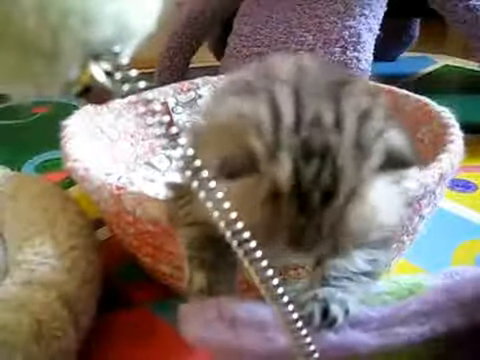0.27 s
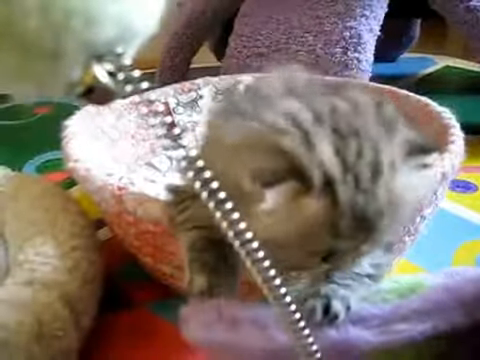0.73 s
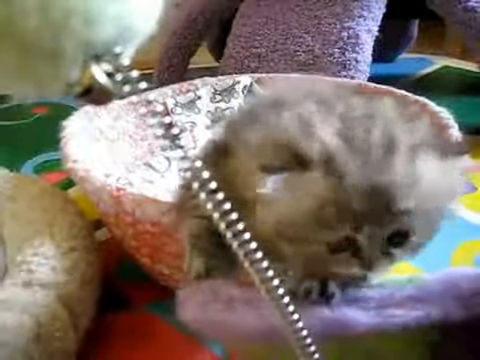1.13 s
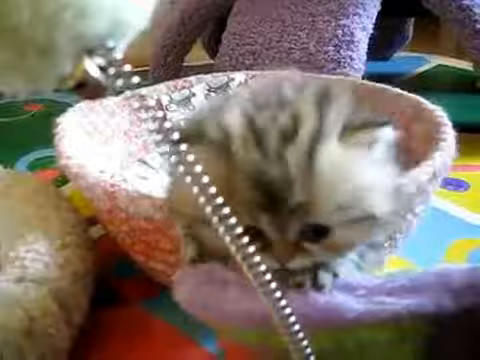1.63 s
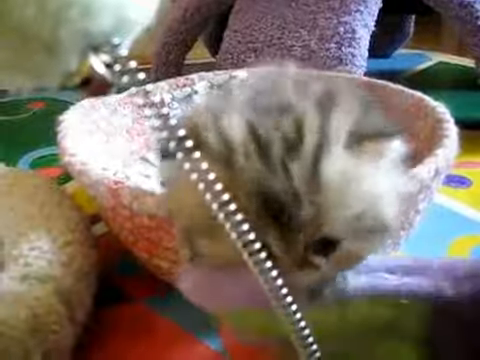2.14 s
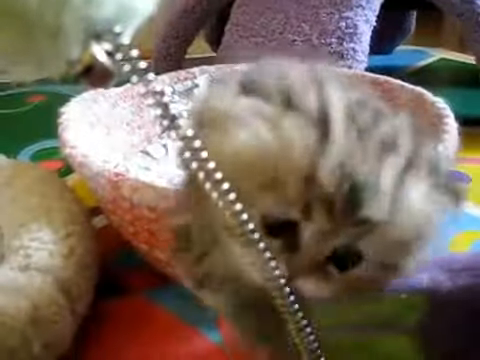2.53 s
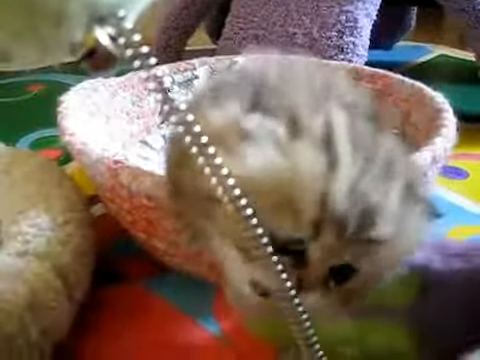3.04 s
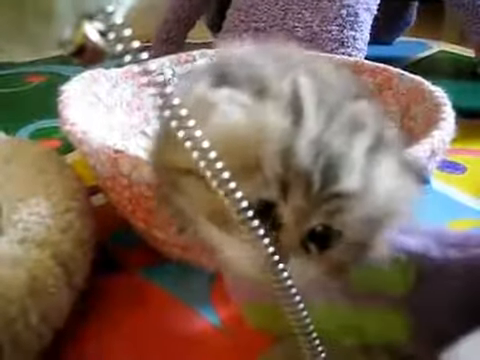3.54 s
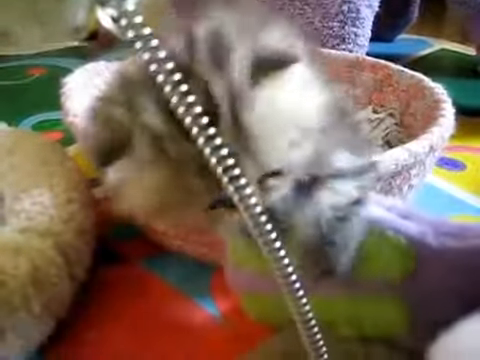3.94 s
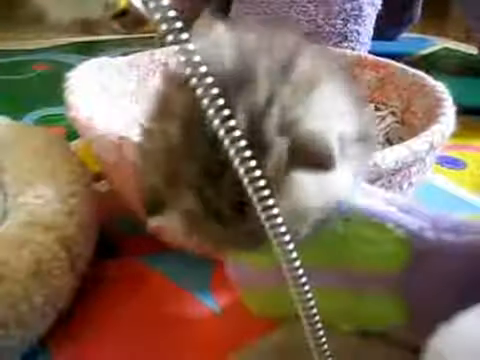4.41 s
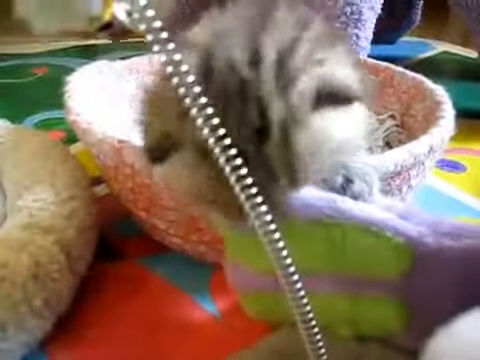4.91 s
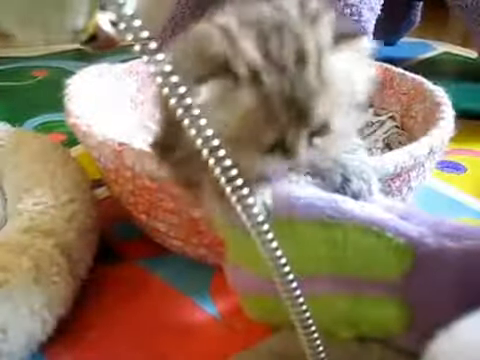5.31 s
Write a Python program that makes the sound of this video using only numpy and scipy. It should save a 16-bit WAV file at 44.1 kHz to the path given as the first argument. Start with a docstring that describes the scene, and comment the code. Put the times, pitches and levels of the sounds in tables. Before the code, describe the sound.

A small metal bead chain clicks faintly and irregularly as a kitten bites and noses it, with soft rustling over room hiss.

```python
"""A taut metal bead chain clicks as a kitten in a basket noses and bites it, close by in a quiet room.
Each impact of teeth or beads excites resonances that fur and tension damp within milliseconds.
The kitten's moves bump the basket and rub cloth and beads; basket, floor and walls return short echoes.
Behind lie an even hiss, a thin appliance whine and a faint low drone. The sound is mono, dull on top."""
import sys
import numpy as np
from scipy import signal
from scipy.fft import rfft, irfft
from scipy.io import wavfile
from scipy.ndimage import uniform_filter1d

SR = 44100
rng = np.random.default_rng(int(sys.argv[2]) if len(sys.argv) > 2 else 0)


def dump(signal):
    """Clip the signal to [-1, 1] and save it as 16-bit WAV at the path in sys.argv[1]."""
    limited = np.clip(np.atleast_2d(signal).T, -1, 1)
    pcm = np.round(limited * 32767).astype(np.int16)
    wavfile.write(sys.argv[1], SR, pcm)


N = 245195

# Modes of a contact, from dull knock to bead tick: (frequency [Hz], ring length [ratio])
MODES = [(850, 1.8), (1500, 1.58), (2300, 1.21), (3750, 1.07), (5750, 0.73)]
# Teeth and claws on the chain: (time [s], tuning [ratio], base rise time [s], knock centre [Hz],
# knock half-width [octaves], relative knock level [dB], relative tick level [dB])
BITE_IMPACTS = [(0.658, 1.03, 0.00042, 2400, 0.51, -32, -30.5), (1.019, 0.85, 0.0005, 1600, 0.41, -39, -55),
                (2.0722, 1.02, 0.0004, 1000, 2.6, -35, -25.5),
                (2.7355, 0.94, 0.00054, 1450, 0.94, -33.5, -42),
                (2.9382, 0.96, 0.0007, 2160, .7, -26.5, -42), (2.942, 0.99, 0.00059, 3100, 0.8, -27, -29),
                (2.9494, 1.2, 0.00087, 1550, 0.63, -37, -47), (2.98, 1.3, 0.00038, 1760, 1.6, -38, -42),
                (3.001, 1.02, 0.00046, 1650, 0.81, -25, -34.5),
                (3.0538, 1.11, 0.00039, 1910, .7, -30.5, -26.5),
                (3.0718, 1.05, 0.00038, 2640, 1.1, -29.5, -28),
                (3.2266, 0.98, 0.00031, 900, 3.1, -33.5, -37), (3.434, 1.006, 0.0005, 5000, 1.7, -24, -36),
                (3.658, 1.3, 0.00031, 1900, 1.25, -26, -23.5), (3.903, 1.05, 0.00039, 3300, 2.6, -24, -36),
                (3.9283, 1.09, 0.00022, 4100, .65, -20, -34), (3.931, 0.92, 0.00055, 2400, 1.4, -29.5, -33),
                (4.7746, 0.96, 0.00044, 3600, 2, -40, -41),
                (4.9448, 1.024, 0.00054, 2000, 0.85, -29.5, -24),
                (5.101, 0.98, 0.00062, 2420, 0.75, -45.5, -49)]


def bites(gain_db):
    """Modal superposition: a knock excites the modes near its centre, the beads' tick the highest."""
    out = np.zeros(N)
    t = np.arange(SR // 100) / SR
    modes_hz, length = np.transpose(MODES)
    for s, tuning, rise_s, centre_hz, octaves, knock_db, tick_db in BITE_IMPACTS:
        hz = modes_hz * tuning  # the grip shifts the tuning
        excitation = 1 / (1 + (np.log2(hz[:-1] / centre_hz) / octaves) ** 2)
        gains = np.append(undb(knock_db) * excitation / excitation.max(), undb(tick_db))
        add(out, s, gains @ burst(t, hz[:, None], length[:, None] * rise_s))
    return out * undb(gain_db)


# Bead on bead: (time [s], tuning [ratio], relative level [dB], fall toward the bass [dB/octave])
BEAD_IMPACTS = [(0.082, 1.1, -31.5, 26), (0.7339, 1.16, -27, 23), (0.738, 1.2, -31, 20),
                (0.7803, 0.88, -28, 13), (0.7838, 0.83, -36, 10), (2.0631, 0.91, -28.5, 14),
                (2.3667, 0.85, -35, 18), (4.082, 0.92, -35, 7), (4.1437, 1.36, -20, 12),
                (4.3492, 0.97, -34.5, 1.5), (4.4096, 0.98, -38, 8)]


def bead_ticks(gain_db, rise_s=0.00029):
    """Hard impact: brief metal contacts excite the highest mode most, the lower ones ever less."""
    out = np.zeros(N)
    t = np.arange(SR // 100) / SR
    hz, length = np.transpose(MODES)
    for s, tuning, db, fall_db in BEAD_IMPACTS:
        gains = undb(db - fall_db * np.log2(hz[-1] / hz))
        add(out, s, gains @ burst(t, tuning * hz[:, None], length[:, None] * rise_s))
    return out * undb(gain_db)


def stray_ticks(count=8, db=-45, spread_db=2, rise_s=0.00025, low_hz=2500, high_hz=5800):
    """Damped oscillation: beads of the swaying chain touch at random, each ringing one faint mode."""
    out = np.zeros(N)
    t = np.arange(SR // 100) / SR
    for when, pitch, size in rng.random((count, 3)):
        hz = low_hz + pitch * (high_hz - low_hz)
        gain = undb(db + spread_db * (2 * size - 1))
        add(out, when * N / SR, gain * burst(t, hz, rise_s))
    return out


def settling_beads(base_db=-51, spread_db=5, mean_lag_s=0.011, rise_s=0.00024,
                   low_hz=1510, high_hz=6100):
    """Secondary impact: after each bite a neighbouring bead settles with a faint tick."""
    out = np.zeros(N)
    t = np.arange(SR // 100) / SR
    for s, *_ in BITE_IMPACTS:
        lag, pitch, size = rng.random(3)
        hz = low_hz + pitch * (high_hz - low_hz)
        gain = undb(base_db + spread_db * (2 * size + 1))  # 5 to 15 dB above the base
        add(out, s + 2 * lag * mean_lag_s, gain * burst(t, hz, rise_s))
    return out


# Kitten against basket: (time [s], frequency [Hz], rise time [s], peak level [dB])
BASKET_BUMPS = [(0.814, 131, 0.01, -48), (1.078, 680, 0.0014, -38.5), (3.213, 265, 0.01, -51),
                (3.32, 122.8, 0.018, -51), (4.1, 117, .035, -58)]


def basket():
    """Heavily damped resonance: the basket thuds as the kitten shifts its weight."""
    out = np.zeros(N)
    t = np.arange(SR // 5) / SR
    for s, hz, rise_s, db in BASKET_BUMPS:
        add(out, s, undb(db) * burst(t, hz, rise_s))
    return out


def friction(hz, width_hz, grain_db):
    """Stick-slip friction: noise of rms 1 in a broad resonance, catching and slipping unevenly."""
    bins = np.fft.rfftfreq(N, 1 / SR)
    noise = irfft(rfft(rng.standard_normal(N)) / (1 + ((bins - hz) / width_hz) ** 2), N)
    return level(noise * undb(grain_db * walk(60)), 0)


# The kitten's moves: (time [s], paws-on-cloth level [dB], fur-on-chain level [dB])
MOVES = [(.33, -61, -81), (.92, -63, -74.5), (1.66, -64, -76.5), (3.02, -68.5, -58.5), (3.88, -69.5, -58)]


def rustle(attack_s=0.09, release_s=0.36, rest_db=-80.5):
    """Friction noise of paws on cloth and fur on beads grows and decays exponentially with each move."""
    t = np.arange(N) / SR
    cloth_gain = fur_gain = undb(rest_db)
    for s, cloth_db, fur_db in MOVES:
        envelope = np.exp(-np.maximum((s - t) / attack_s, (t - s) / release_s))
        cloth_gain = cloth_gain + undb(cloth_db) * envelope
        fur_gain = fur_gain + undb(fur_db) * envelope
    cloth = friction(hz=736, width_hz=260, grain_db=3)
    fur = friction(hz=3230, width_hz=7500, grain_db=5.5)
    return cloth_gain * cloth + fur_gain * fur


# Spectrum of the hiss: (frequency [Hz], relative spectral density [dB])
HISS_SPECTRUM = [(8, -8.5), (20, 1.5), (70, 0), (110, -1), (170, -3.5), (480, -7.5), (900, -6),
                 (1250, -9.5), (1900, -11.5), (3000, -14), (4500, -17), (6100, -19), (6800, -21.5)]


def hiss(rms_db=-51, waver_db=0.8):
    """Broadband noise of room and microphone, its spectral density greatest in the bass."""
    hz, db = np.transpose(HISS_SPECTRUM)
    bins = np.maximum(np.fft.rfftfreq(N, 1 / SR), 1)
    colour = undb(np.interp(np.log(bins), np.log(hz), db))
    noise = irfft(rfft(rng.standard_normal(N)) * colour, N)
    return level(noise, rms_db) * undb(waver_db * walk(9.7))


# Partials of the whine: (frequency [Hz], initial rms level [dB], fade [dB/s], pitch waver [Hz])
WHINE_PARTIALS = [(239.8, -72.5, 1, 5), (573, -66, 2.2, 2.2), (1398, -68, 0, 0.78), (1757, -75.5, 2.5, 5.7)]


def appliance():
    """Random frequency modulation: thin tones waver in pitch, and most slowly fade."""
    t = np.arange(N) / SR
    return sum(undb(db - fade * t) * tone(hz + waver * walk(12))
               for hz, db, fade, waver in WHINE_PARTIALS)


# Course of the drone: (time [s], frequency [Hz], rms level [dB])
DRONE_PATH = [(0, 120.6, -63.5), (.6, 123.7, -62.5), (.85, 127.1, -56.5), (1.05, 128.7, -64),
              (1.3, 106.9, -63.5), (1.8, 99.8, -65), (2.1, 119, -72.5), (5.56, 119.7, -71)]


def drone(waver_hz=4.7, flutter_db=1.5):
    """Frequency and amplitude modulation: a far low hum drifts in pitch, swells once and fades."""
    t = np.arange(N) / SR
    times, pitches, levels = np.transpose(DRONE_PATH)
    carrier = tone(np.interp(t, times, pitches) + waver_hz * walk(20))
    return carrier * undb(np.interp(t, times, levels) + flutter_db * walk(11))


def burst(t, hz, rise_s):
    """Damped oscillation: a sine whose envelope rises to 1 at rise_s and dies away."""
    u = t / rise_s
    return u ** 2 * np.exp(2 - 2 * u) * np.sin(2 * np.pi * hz * t)


def reflections(x, t60, db, delay_s):
    """Diffuse reverberation: scattered echoes begin after a delay and decay exponentially."""
    t = np.arange(SR // 2) / SR
    response = rng.standard_normal(len(t)) * np.exp(-np.log(1000) * t / t60) * (t > delay_s)
    return signal.fftconvolve(x, response * undb(db) / np.linalg.norm(response))[:N]


def tone(hz):
    """Phase as the integral of frequency: a sine of rms 1 follows a pitch curve."""
    return np.sqrt(2) * np.sin(2 * np.pi * (np.cumsum(hz) / SR + rng.random()))


def walk(rate):
    """Low-pass noise: random values held for 1 / rate seconds and smoothed twice, spread near 1."""
    k = int(SR / rate)
    held = np.repeat(rng.standard_normal(N // k + 1), k)
    return 1.313 * uniform_filter1d(uniform_filter1d(held, k), k)[:N]


def undb(db):
    """Decibels to amplitude ratio."""
    return 10 ** (np.asarray(db) / 20)


def level(x, db):
    """Normalisation to an rms level."""
    return x * undb(db) / np.sqrt(np.mean(x ** 2))


def add(out, s, sound):
    """Superposition of a sound starting at time s."""
    i = int(s * SR)
    out[i:i + len(sound)] += sound[:len(out) - i]


def scene():
    """Superposition: direct clicks, their echoes off basket, floor and walls, and the softer sources."""
    clicks = bites(gain_db=0.5) + bead_ticks(gain_db=2.5) + stray_ticks() + settling_beads()
    near = reflections(clicks, t60=0.03, db=-11.5, delay_s=0.0011)
    walls = reflections(clicks, t60=0.14, db=-16, delay_s=0.0091)
    background = hiss() + appliance() + drone()
    mono = clicks + near + walls + basket() + rustle() + background
    return np.array([mono, mono])


def record(dry, cutoff_hz=6680):
    """Linear-phase low-pass: a small camera cuts the treble steeply, delaying all frequencies alike."""
    taps = signal.firwin(301, cutoff_hz, window=("kaiser", 7), fs=SR)
    return signal.fftconvolve(dry, taps[None], mode="same", axes=1)


dry = scene()
out = record(dry)
dump(out)
```